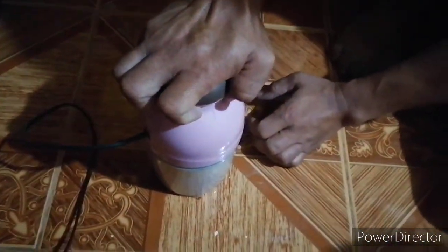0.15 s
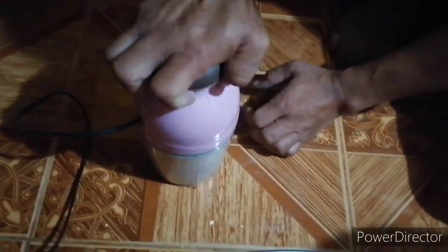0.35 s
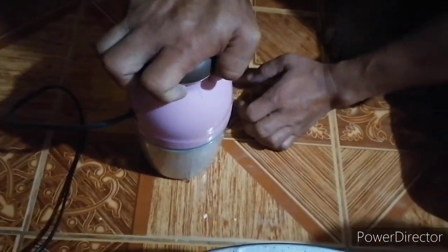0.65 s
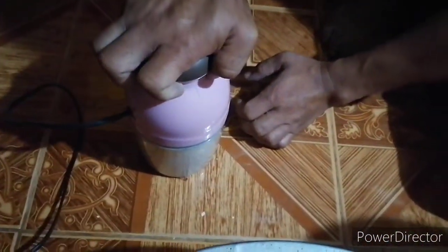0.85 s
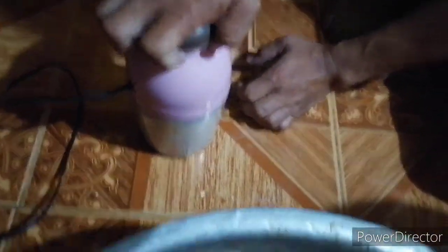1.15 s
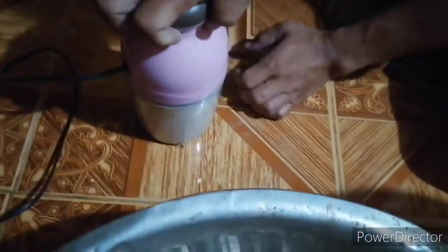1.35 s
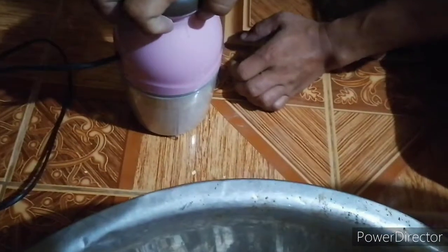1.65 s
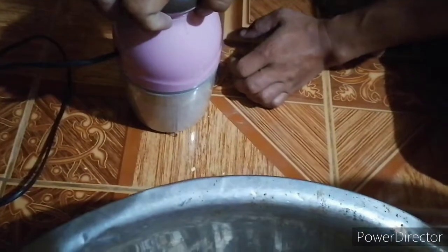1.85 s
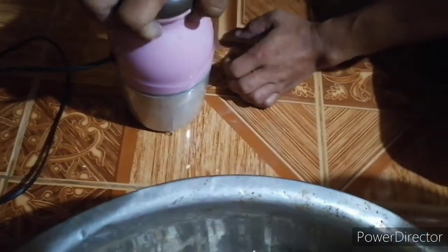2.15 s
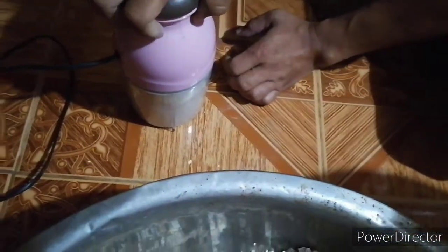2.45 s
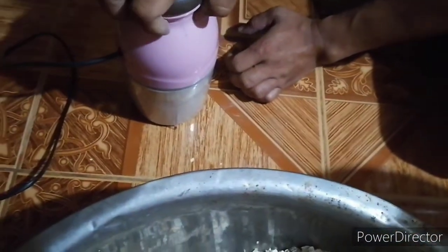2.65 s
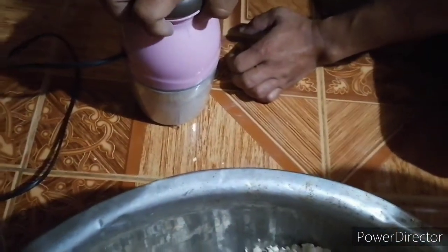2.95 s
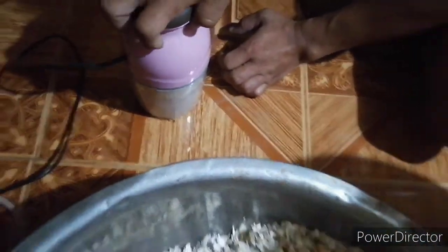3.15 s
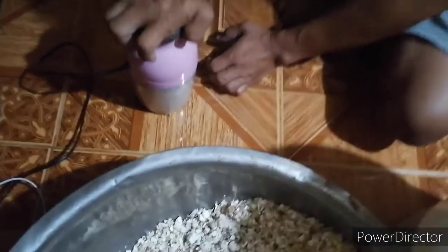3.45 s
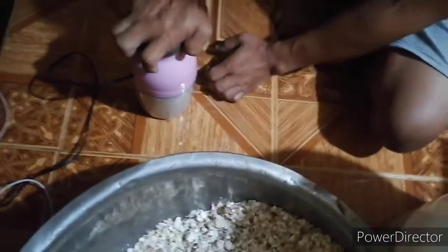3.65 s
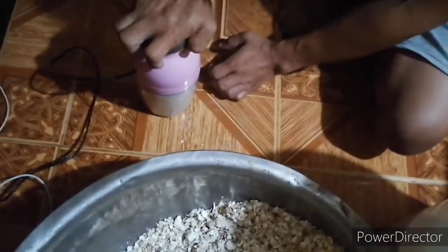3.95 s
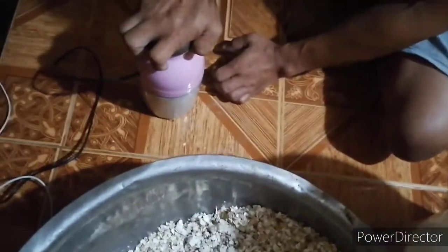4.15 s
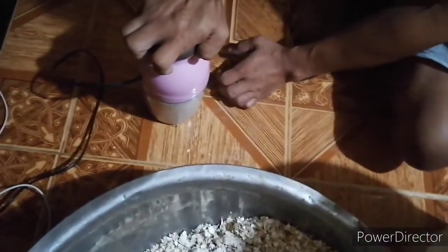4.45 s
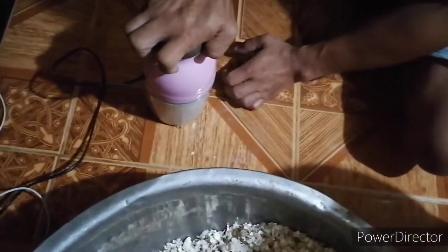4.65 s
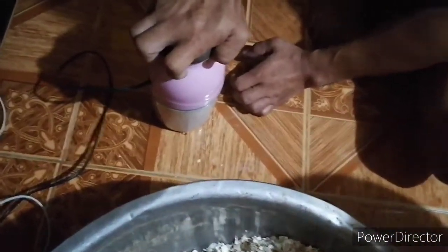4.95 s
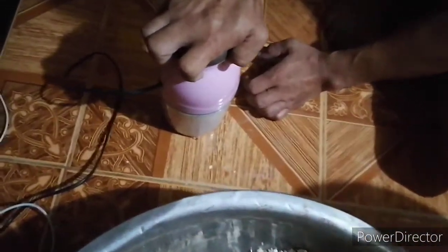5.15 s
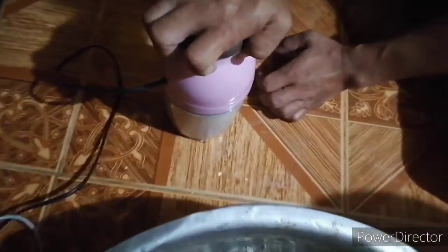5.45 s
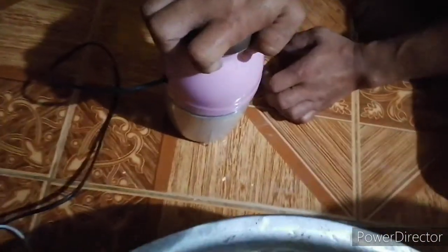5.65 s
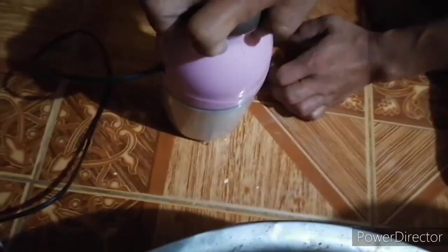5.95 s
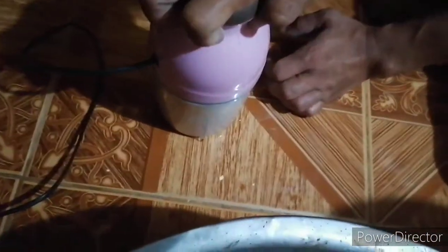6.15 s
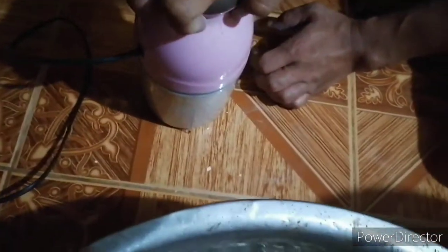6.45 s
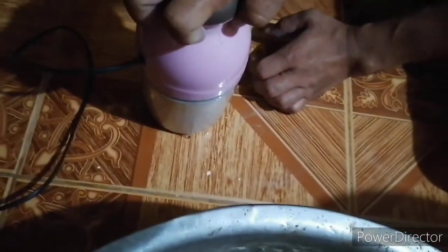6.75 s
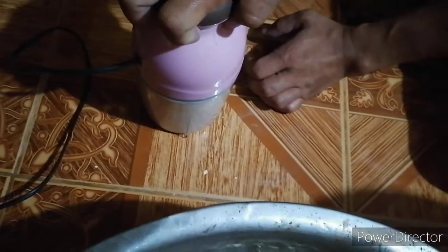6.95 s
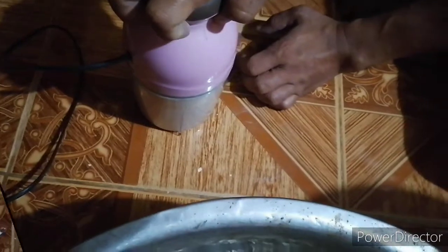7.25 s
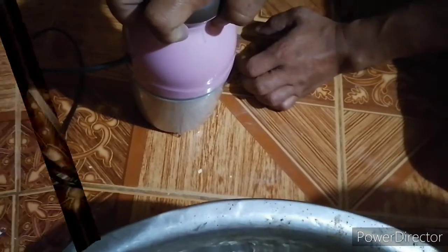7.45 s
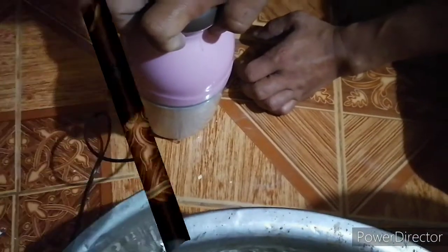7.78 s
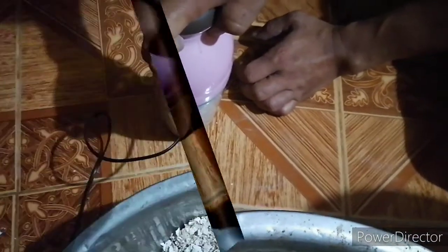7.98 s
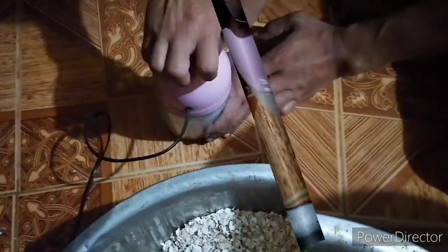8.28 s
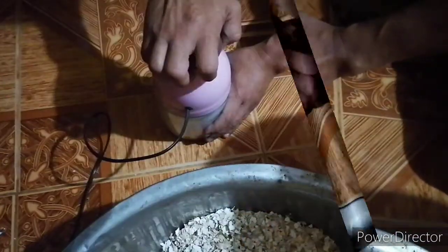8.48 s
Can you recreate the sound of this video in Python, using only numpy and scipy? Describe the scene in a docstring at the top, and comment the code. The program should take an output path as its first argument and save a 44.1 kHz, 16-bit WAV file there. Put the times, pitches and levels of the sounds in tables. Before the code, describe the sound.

A small electric grinder is already running at the start, crushing brittle shells, heard close up in a small room. Countless fragments strike its cup, making a dense, bright, gritty roar with a slight ring, and larger pieces break with sharp clicks at irregular moments. At about 2.3 seconds it is released and quickly coasts to a stop, the cup ringing briefly. The pause holds faint room hush and a few very soft low bumps between 2.6 and 2.9 seconds. A thin, dry, quiet hiss comes at 3 seconds. At 3.3 seconds the grinder starts again with a cluster of snaps. It sounds slightly quieter and hollower at first, filling out from about 4.5 to 6 seconds. The grinding continues steadily, shifting a little between coarse crunch and fine grit, with scattered snaps, until it cuts off abruptly at about 8.2 seconds.

```python
"""A small electric grinder on a hard floor is pressed down twice to crush brittle shells.
Its blade flings thousands of fragments a second against the cup, which rings in a small room,
and now and then a larger piece snaps. Between the two runs it coasts to a stop, and a thin dry
hiss comes just before it starts again. Behind it are room air, faint noise and soft low bumps."""
import sys
import numpy as np
from scipy import signal
from scipy.fft import rfft, irfft, next_fast_len
from scipy.io import wavfile
from scipy.ndimage import uniform_filter1d

SR = 44100
rng = np.random.default_rng(int(sys.argv[2]) if len(sys.argv) > 2 else 0)


def int16_out(signal):
    """Quantize to a 16-bit WAV file."""
    q = np.round(np.clip(np.atleast_2d(signal).T, -1, 1) * 32767)
    wavfile.write(sys.argv[1], SR, q.astype(np.int16))


N = 380141
TIME = np.arange(N) / SR
SIZE = next_fast_len(N + SR // 2)   # spare length for the echoes
HZ = np.maximum(np.arange(SIZE // 2 + 1) * SR / SIZE, 1)


def grinder(force, slowing_db, slack_db, dulling, sing_db, low_cut_hz):
    """Blade speed sets how hard fragments hit; a slowing blade loses its grit and the cup sings on."""
    hits = impacts(per_s=10000, clump_db=1.0, swirl_db=2.0, roam_db=0.92, own_ring=3.2, count=24)
    hits = settling(hits) / np.sqrt(1 + (low_cut_hz / HZ) ** 4)
    hits = hits / np.std(to_wave(hits))
    roar = body(hits, slack_db) + crunch_and_grit(hits)
    hardness = from_db(dulling * slowing_db)
    singing = (1 - hardness) * from_db(sing_db) * to_wave(hits * resonance(hz=2210, width_hz=760))
    return force * surging(hardness * roar + singing)


# The two runs of the blade. A slack (loose) load grinds more quietly, by the slack drop.
# on_s, off_s, level_db, slack_drop_db, left_over_right_db
BLADE_RUNS = [(-0.3, 2.315, -30.5, 0.14, 0.56), (3.302, 8.3, -31, 3, -0.56)]

def blade():
    """Each run spins up, slowly draws the slack load in, and coasts once the switch is let go."""
    spin_up_s, force_power = 0.049, 1.27   # force grows as this power of the speed
    slack_s, draw_in_s = 1.21, 0.86
    coast_db_per_s, linger_db, linger_db_per_s = 185, -36, 38
    controls = np.zeros((4, N))
    for on, off, level_db, drop_db, pan_db in BLADE_RUNS:
        speed = 1 - np.exp(-since(on) / spin_up_s)
        slack_db = drop_db * np.exp(-since(on + slack_s) / draw_in_s)
        faint_tail_db = linger_db - linger_db_per_s * since(off)
        slowing_db = np.maximum(-coast_db_per_s * since(off), faint_tail_db)
        force = from_db(level_db - slack_db + slowing_db) * speed ** force_power
        controls = np.where(TIME >= on, [force, slowing_db, slack_db, np.full(N, pan_db)], controls)
    return controls


def impacts(per_s, clump_db, swirl_db, roam_db, own_ring, count):
    """The load tumbles in clumps and roams, so each spot on the wall gets its own showers of hits."""
    clumps_db = clump_db * flutter(31)
    spectrum, power = 0, 0
    spots = paths(near_fade_s=0.013, room_fade_s=0.2, room_share=0.68, count=count)
    for hz, path in zip(np.geomspace(900, 9000, count), spots):
        hits = grains(per_s / count, spread_db=2.5)
        showers = from_db(clumps_db + swirl_db * flutter(22) + roam_db * drift(2.5))
        ring = 1 + own_ring * resonance(hz, hz / 12)   # every spot favours a pitch of its own
        spectrum = spectrum + rfft(hits * showers, SIZE) * ring * path
        power = power + np.abs(ring * path) ** 2
    # Even out the spots over 35 Hz bands, so that only the grinding tone gives a broad colour.
    band_power = uniform_filter1d(power, size=round(35 * SIZE / SR))
    return spectrum / np.sqrt(band_power) * grinding_tone()


# The sound of one fragment hitting the wall: pitch_hz, left_db, right_db
FRAGMENT_CRACK = [(50, -30, -31), (75, -29, -30), (105, -19.7, -20.5), (380, -19.9, -21.3),
                  (480, -21.1, -19.8), (1500, -16.4, -11.9), (2100, -8.8, -7.7), (3300, -8.5, -5.4),
                  (3900, -12.6, -9.1), (5500, -5.9, -6.4), (7300, -7.7, -14.0), (8800, -16.7, -19.1),
                  (10800, -21.4, -21.8), (13500, -23.0, -22.9), (15000, -25.6, -26.2)]
# Peaks and dips in the grinding's tone, with a bright peak near 7 kHz:
# pitch_hz, width_hz, left_db, right_db
TONE_PEAKS = [(194, 31, 1.6, 1), (308, 29, 0.3, 2.2), (463, 47, 10.4, 5.9), (524, 27, 3.1, 4.3),
              (642, 117, 10.1, 3.6), (764, 51, -5.1, -4.5), (863, 150, 6.3, 2.9), (1045, 111, 5.0, 8.1),
              (1198, 113, 5.1, 1.8), (1385, 64, 7, 2), (1741, 177, 5.8, 3.7), (2026, 215, 1.6, 3.9),
              (2161, 36, 2.4, 5.4), (2405, 80, 2.5, 3.1), (2662, 160, -0.5, 3.0), (3070, 150, 2.4, 4.2),
              (4600, 478, -0.4, -1.4), (5922, 763, -1.0, 3.8), (7064, 479, 6.7, 11.3),
              (9841, 386, 1.3, 1.5), (14762, 433, 5.8, 6.4)]

def grinding_tone():
    """The crack of a fragment, louder at some pitches and quieter at others."""
    response = from_db(in_pitch(FRAGMENT_CRACK))
    for hz, width_hz, left_db, right_db in TONE_PEAKS:
        response = response * lifted(hz, width_hz, [[left_db], [right_db]])
    return response


# Sound that comes straight from the cup: pitch_hz, power_share (0 to 1), right_delay_ms
STRAIGHT_SOUND = [(60, 0.4, .05), (200, 0.91, 0.046), (560, 0.88, 0.043), (1000, 0.25, 0.15),
                  (1380, 0.3, 0.29), (2230, 0, 0.38), (4000, 0.12, 0.24), (4250, 0.28, 0.528),
                  (7500, 0.2, 0.565), (15000, 0, .56)]

def paths(near_fade_s, room_fade_s, room_share, count):
    """From each spot on the wall, sound comes straight, bounces off floor and hands, and echoes."""
    share, delay_ms = in_pitch(STRAIGHT_SOUND)
    straight = np.sqrt(share) * np.exp(-2j * np.pi * HZ * delay_ms / 1000 * [[0], [1]])
    for spot in range(count):
        near = np.sqrt(1 - room_share) * echoes(near_fade_s)
        room = np.sqrt(room_share) * echoes(room_fade_s)
        yield straight + np.sqrt(1 - share) * rfft(near + room, SIZE)


# How the cup rings before the load has settled: pitch_hz, width_hz, change_db
UNSETTLED_RINGS = [(320, 30, -1), (474, 78, 1.5), (750, 60, -1), (1040, 73, 1.5), (1790, 200, -2.3),
                   (2067, 40, 0.5), (2330, 70, 1)]

def settling(hits):
    """The cup rings a little differently once the load has settled between the runs."""
    restart_s = BLADE_RUNS[1][0]
    unsettled = with_rings(hits, UNSETTLED_RINGS)
    return rfft(np.where(TIME < restart_s, to_wave(unsettled), to_wave(hits)), SIZE)


BODY_TOP_HZ, CRUNCH_TOP_HZ = 1450, 4000   # body is lowest, then crunch, then grit
# How the crunch and grit rise and fall as the load shifts: time_s, crunch_db, grit_db
LOAD_SHIFTS = [(0.1, -1.2, 0.5), (0.62, -0.6, -.2), (0.93, 0.5, 0.4), (1.25, 0, -0.3), (1.62, .5, 0.4),
               (2.02, -1.5, 1), (2.3, -1, 0), (3.45, -1, 1.1), (3.8, 0.5, 0), (4.2, -1.1, -0.5),
               (4.48, 1, 0), (4.68, 1.2, 1), (5.15, -0.5, -0.5), (5.45, 0.7, 0.1), (5.95, 0, 0),
               (6.2, -1.2, 1), (6.38, -0.5, -0.5), (6.7, 1, -0.2), (7.55, 0.2, -0.5), (7.8, -1.1, -0.2),
               (8.1, 1, -0.4)]

def crunch_and_grit(hits):
    """The shifting load tips the balance between coarse crunch and fine grit."""
    upper = hits / np.sqrt(1 + (BODY_TOP_HZ / HZ) ** 80)
    crunch = upper / (1 + (HZ / CRUNCH_TOP_HZ) ** 8)
    crunch_db, grit_db = in_time(LOAD_SHIFTS)
    return to_wave(crunch) * from_db(crunch_db) + to_wave(upper - crunch) * from_db(grit_db)


# How a slack load makes the cup sound hollow: pitch_hz, width_hz, change_db
HOLLOW_RINGS = [(200, 250, 1.8), (475, 65, -6.5), (575, 90, 5.8), (860, 120, -3.2), (985, 70, 1.5),
                (1100, 70, 1.2), (1310, 110, -2)]
# Narrow rings that keep their pitch whatever the load does: pitch_hz, width_hz, boost_db
STEADY_RINGS = [(108, 14, 4.5), (195, 10, 2), (311, 9, 6), (476, 14, 3.3), (642, 12, 2.2), (1027, 30, .7)]

def body(hits, slack_db):
    """The cup's low ringing: hollow while the load is slack, and swaying as it tumbles."""
    full = hits / np.sqrt(1 + (HZ / BODY_TOP_HZ) ** 80)
    hollow = with_rings(full, HOLLOW_RINGS)
    hollowness = np.clip(slack_db / 3, 0, 1)   # fully hollow from a 3 dB drop on
    low = (1 - hollowness) * to_wave(full) + hollowness * to_wave(hollow)
    delay_s = 0.0016 * drift(1.6)   # a changing delay bends the pitch
    swayed = np.array([np.interp(TIME - delay_s, TIME, side) for side in low])
    ringing = to_wave(with_rings(rfft(swayed, SIZE), STEADY_RINGS))
    crunch_db = in_time(LOAD_SHIFTS)[0]
    wander_db = -0.2 * drift(0.82)
    return ringing * from_db(0.21 + 0.26 * crunch_db + wander_db)


# Moments when the cup rings out at one pitch: middle_s, half_length_s, pitch_hz, width_hz, boost_db
LOAD_SURGES = [(0.97, .17, 2470, 349, 2), (2.33, 0.059, 2300, 452, 4), (2.64, .1, 1700, 301, 7.5),
               (3.418, 0.034, 2270, 650, 5), (3.409, .03, 596, 400, 4.5), (6.199, .14, 5830, 451, 2),
               (7.4, 0.96, 2140, 110, 2.5)]

def surging(sound):
    """Each surge of the churning load makes one ring of the cup swell and fade."""
    spectrum = rfft(sound, SIZE)
    for middle_s, half_length_s, hz, width_hz, boost_db in LOAD_SURGES:
        swell = np.exp(-((TIME - middle_s) / half_length_s) ** 2)
        ring = to_wave(spectrum * resonance(hz, width_hz))
        sound = sound + (from_db(boost_db) - 1) * swell * ring
    return sound


# Larger pieces of shell breaking, and at 3.314 s the switch clicking on: start_s, level_db
SHELL_SNAPS = [(0.103, -18), (0.2380, -21), (0.621, -20), (0.94, -20.5), (1.0505, -24), (1.186, -18),
               (2.159, -21), (2.29, -20.5), (2.3138, -20), (3.3142, -36), (3.336, -26), (3.345, -24.5),
               (3.4134, -23), (3.4667, -26), (3.8092, -20.5), (4.014, -31), (4.9382, -22.5), (5.599, -20.5),
               (6.168, -17), (6.6857, -19.5), (7.289, -22), (7.7292, -20), (7.905, -20.5)]

def snaps():
    """A large piece breaking, or the switch, gives one sharp click that has the same tone as the grinding."""
    clicks = np.zeros(N)
    for start_s, level_db in SHELL_SNAPS:
        clicks[round(start_s * SR)] = from_db(level_db)
    path = next(paths(near_fade_s=0.012, room_fade_s=0.25, room_share=0.59, count=1))
    response = grinding_tone() * path
    return to_wave(rfft(clicks, SIZE) * response) / np.abs(to_wave(response)).max()


# The tone colour of the hiss: pitch_hz, strength_db
HISS_TONE = [(3000, -41), (4400, -37), (4800, -20), (5700, -23), (6400, -9), (7100, -2), (7800, -10.5),
             (9000, -17.5), (12000, -20.5), (15000, -22.5)]

def thin_hiss(start_s, end_s, ticks_per_s, level_db, swell_db, pan_db):
    """A dry sizzle of tiny ticks swells, sags to a steady level and ends as the blade starts."""
    rise_s, sag_s, fade_s = 0.11, 0.06, 0.01
    ticks = np.array([grains(ticks_per_s, spread_db=2.0) for side in range(2)])
    sizzle = panned(coloured(ticks, HISS_TONE), pan_db)
    rise = np.minimum(since(start_s) / rise_s, 1) ** 2
    extra_db = swell_db * np.exp(-since(start_s + rise_s) / sag_s)
    fade = np.exp(-since(end_s) / fade_s)
    return rise * from_db(level_db + extra_db) * fade * sizzle


# Soft bumps in the pause: start_s, level_db
PAUSE_BUMPS = [(2.58, -67), (2.73, -66), (2.785, -66), (2.92, -69)]
# Their deep tone colour: pitch_hz, strength_db
BUMP_TONE = [(20, 6.5), (45, 2), (130, -5), (250, -18), (800, -30), (3000, -78)]

def bumps(rise_s, fade_s):
    """Each bump is a puff of low noise that rises quickly and dies away."""
    loudness = np.zeros(N)
    for start_s, level_db in PAUSE_BUMPS:
        rise = np.minimum(since(start_s) / rise_s, 1)
        loudness += from_db(level_db) * rise * np.exp(-since(start_s + rise_s) / fade_s)
    return loudness * noise(BUMP_TONE)


# The tone colour of a faint background noise: pitch_hz, strength_db
FAINT_TONE = [(60, -8), (170, -5), (350, 0.5), (600, -5.5), (850, -6.5), (1150, -14.5), (1500, -10),
              (2500, -30), (6000, -51)]
# The pitches it rings at: pitch_hz, width_hz, boost_db
FAINT_RINGS = [(311, 14, 3), (478, 20, 7), (782, 20, 9), (1550, 25, 9)]
# It is louder in the pause and quieter under the hiss: time_s, level_db
FAINT_LEVEL = [(2.5, -76), (2.75, -73), (2.97, -72.5), (3.08, -78), (3.15, -77), (3.25, -78)]

def faint_noise(flicker_db, flickers_per_s):
    """Faint background noise that rings at a few pitches and wavers in level."""
    ringing = with_rings(rfft(noise(FAINT_TONE), SIZE), FAINT_RINGS)
    level_db = in_time(FAINT_LEVEL)[0] + flicker_db * drift(flickers_per_s)
    return from_db(level_db) * rms_one(to_wave(ringing))


# The tone colour of the quiet room: pitch_hz, strength_db
AIR_TONE = [(30, -1.5), (60, 0.5), (130, -5.5), (330, -10.5), (620, -13.5), (1200, -16.5), (1900, -18),
            (2400, -12), (3200, -11.5), (3900, -18), (5500, -14), (7000, -11), (9000, -26), (15000, -24)]

def room_air(level_db):
    """The steady, faint hush of the room."""
    return from_db(level_db) * noise(AIR_TONE)


# How alike the hiss and background are in the two ears: pitch_hz, likeness (0 to 1)
EAR_LIKENESS = [(40, .55), (200, 0.8), (600, 0.6), (1500, 0), (15000, 0.37)]

def coloured(pair, tone):
    """Two unrelated signals become a left and a right of one tone colour, alike in the bass."""
    mid, side = rfft(pair, SIZE)
    alike = in_pitch(EAR_LIKENESS)
    stereo = np.sqrt(1 + alike) * mid + np.sqrt(1 - alike) * side * [[1], [-1]]
    return rms_one(to_wave(stereo * from_db(in_pitch(tone))))


def noise(tone):
    """Steady stereo noise with a tone colour."""
    return coloured(rng.standard_normal((2, N)), tone)


def grains(per_s, spread_db):
    """Clicks at random moments: many small ones, a few large."""
    sizes = from_db(spread_db * np.minimum(rng.exponential(1, N), 5.5))
    return (rng.random(N) < per_s / SR) * sizes * rng.choice([-1, 1], N)


def echoes(fade_s):
    """Dense reflections, different on each side, that fall by 60 dB in fade_s."""
    t = TIME[:SR // 2]
    tail = rng.standard_normal((2, len(t))) * from_db(-60 * t / fade_s)
    return tail / np.sqrt(np.sum(tail ** 2, axis=1, keepdims=True))


def resonance(hz, width_hz):
    """One ring: it passes its own pitch fully and other pitches less."""
    return 1 / (1 + 1j * (HZ ** 2 - hz ** 2) / (HZ * width_hz))


def lifted(hz, width_hz, db):
    """A boost or a dip around one pitch."""
    return 1 + (from_db(db) - 1) * resonance(hz, width_hz)


def with_rings(spectrum, rings):
    """Apply every boost and dip in a table."""
    for hz, width_hz, db in rings:
        spectrum = spectrum * lifted(hz, width_hz, db)
    return spectrum


def drift(per_s):
    """A smooth random wobble, about 1 in size."""
    step, warm_up = 40, 2000
    keep = np.exp(-2 * np.pi * step * per_s / SR)
    jitter = rng.standard_normal(N // step + warm_up + 2)
    slow = signal.lfilter([1], [1, -2 * keep, keep * keep], jitter)[warm_up:]
    return np.interp(np.arange(N) / step, np.arange(len(slow)), rms_one(slow))


def flutter(per_s):
    """A quick wobble that evens out over a fifth of a second."""
    quick = drift(per_s)
    return rms_one(quick - uniform_filter1d(quick, size=SR // 5))


def panned(x, pan_db):
    """Make the left louder than the right by pan_db."""
    return x * from_db(pan_db * np.array([[.5], [-.5]]))


def since(s):
    """Seconds gone by since a moment, 0 before it."""
    return np.maximum(TIME - s, 0)


def from_db(db):
    """Turn decibels into a multiplier."""
    return 10 ** (np.asarray(db) / 20)


def rms_one(x):
    """Scale to an average power of 1."""
    return x / np.sqrt(np.mean(x ** 2) + 1e-20)


def in_time(rows):
    """Join a table's points to get values at every sample."""
    s, *columns = np.transpose(rows)
    return np.array([np.interp(TIME, s, c) for c in columns])


def in_pitch(rows):
    """Join a table's points to get values at every frequency."""
    hz, *columns = np.transpose(rows)
    return np.array([np.interp(np.log(HZ), np.log(hz), c) for c in columns])


def to_wave(spectrum):
    """Go from frequencies back to samples."""
    return irfft(spectrum, SIZE)[..., :N]


def scene():
    """Grinder, hiss and background together."""
    force, slowing_db, slack_db, pan_db = blade()
    machine = grinder(force, slowing_db, slack_db, dulling=0.16, sing_db=12, low_cut_hz=112) + snaps()
    hiss = thin_hiss(start_s=2.995, end_s=3.32, ticks_per_s=18000, level_db=-51, swell_db=5.5, pan_db=-4)
    background = room_air(level_db=-70) + faint_noise(flicker_db=1.5, flickers_per_s=8)
    return panned(machine, pan_db) + hiss + background + bumps(rise_s=0.02, fade_s=0.085)


def record(dry):
    """The highest treble is cut steeply, and all sound ends at once."""
    top_hz, end_s = 15300, 8.182
    dull = to_wave(rfft(dry, SIZE) / np.sqrt(1 + (HZ / top_hz) ** 400))
    ending_db = np.interp(TIME, [end_s - .001, end_s + .001, end_s + .04], [0, -20, -90])
    return dull * from_db(ending_db)


dry = scene()
out = record(dry)
int16_out(out)
```